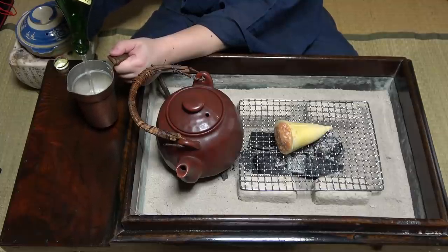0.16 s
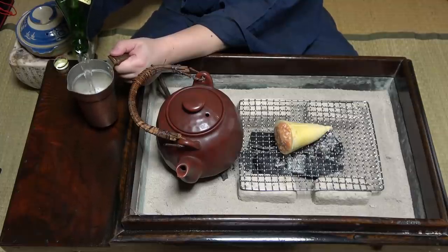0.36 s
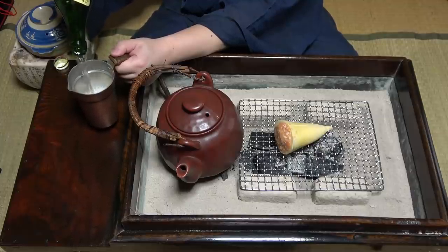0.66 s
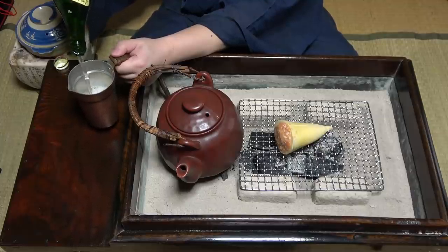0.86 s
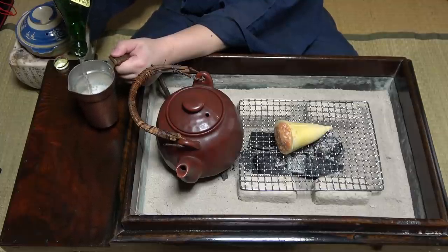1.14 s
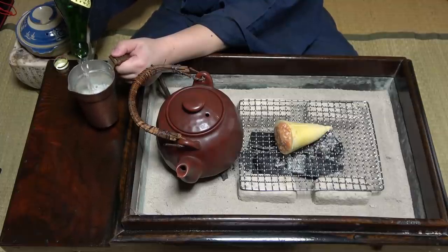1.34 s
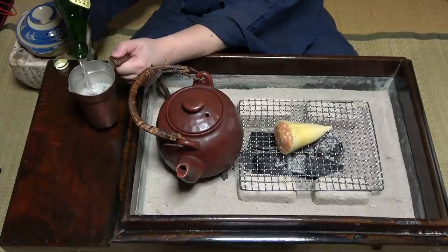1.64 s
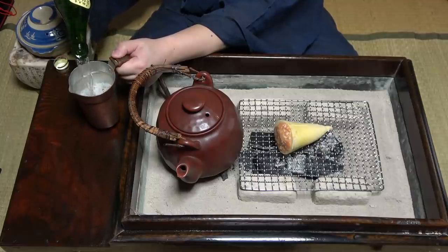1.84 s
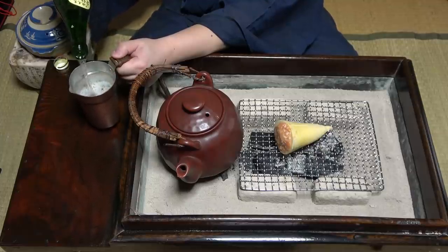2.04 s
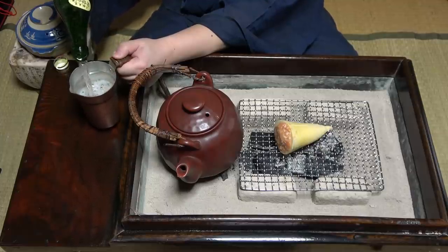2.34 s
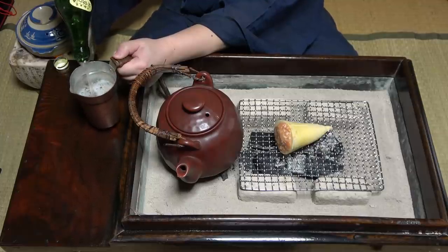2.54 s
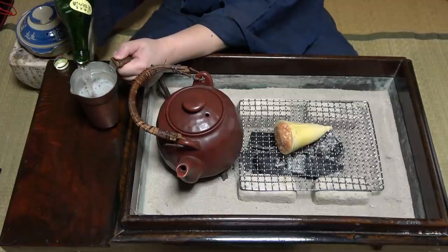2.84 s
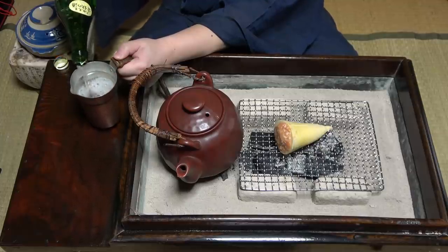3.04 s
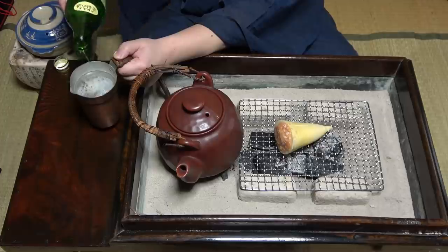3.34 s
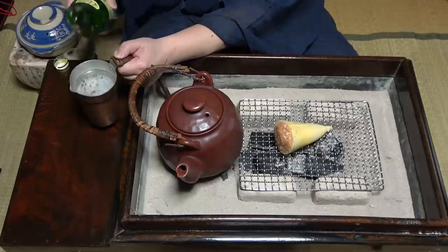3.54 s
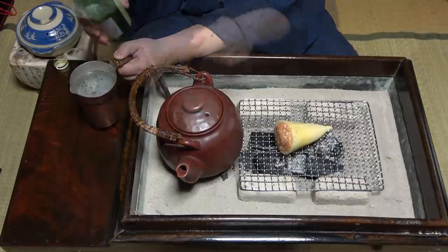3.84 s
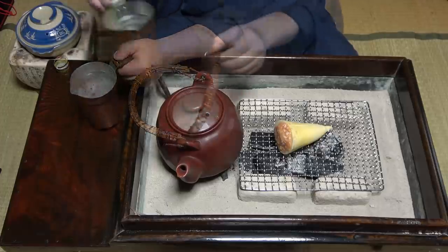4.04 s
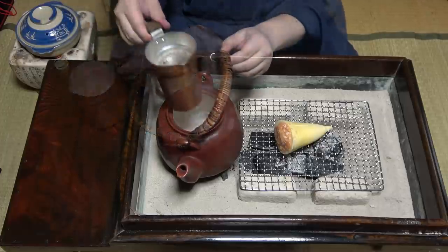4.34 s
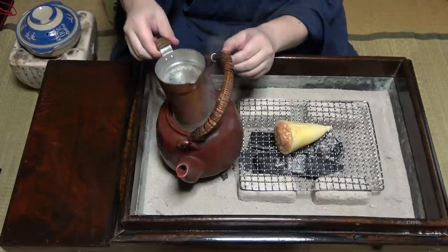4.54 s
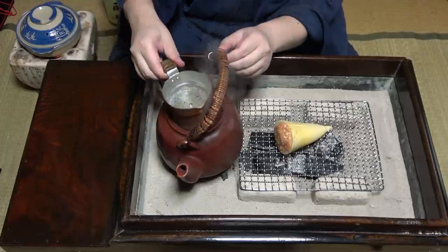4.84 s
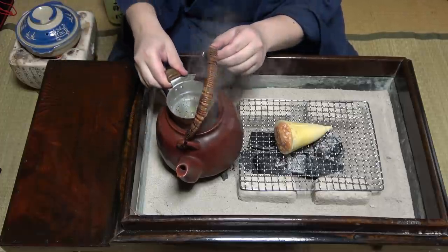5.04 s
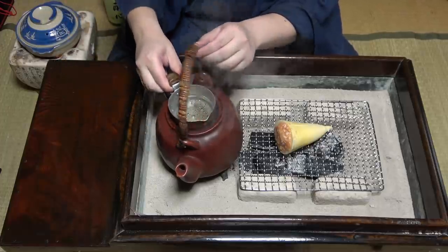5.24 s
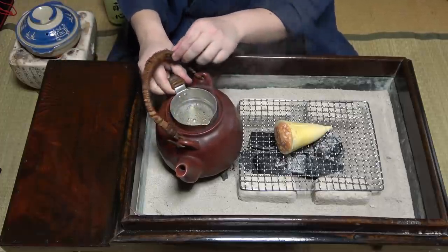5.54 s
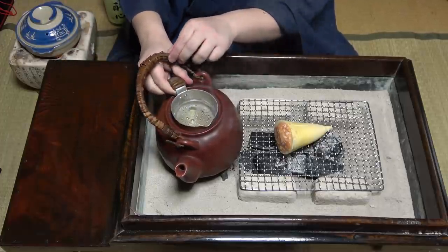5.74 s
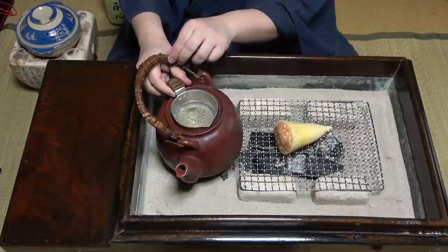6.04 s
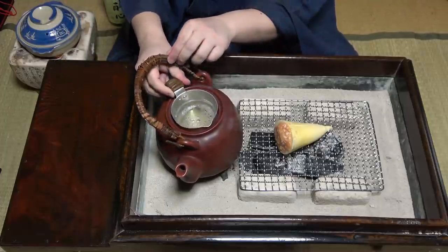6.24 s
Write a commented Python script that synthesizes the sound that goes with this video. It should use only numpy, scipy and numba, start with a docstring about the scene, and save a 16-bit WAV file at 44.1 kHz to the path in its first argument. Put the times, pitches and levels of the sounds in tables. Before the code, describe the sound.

Close up in a small, soft room, liquid bubbles and plops from a glass bottle into a metal cup, its note rising as it thins out. The bottle snaps upright and lands with muted taps. Then one very loud metal clink against a clay pot, light gritty scraping as the cup slides in, two small hollow knocks, and a final clack from the handle. Faint steady hiss.

```python
"""Pouring sake and seating the cup

Sake runs from a glass bottle into a metal cup: trapped bubbles ring near the rising note of the air column,
drops plop, foam crackles and the bottle gulps air. The bottle is put down, sounding its decaying modes.
The cup clinks on the rim of a clay pot, scrapes down into it, and the pot's handle drops back.
A small, soft room adds an echo and a short tail over a faint hiss.
The recorder's limiter ducks after the first clink and creeps back up."""
import sys
import numpy as np
from scipy import signal
from scipy.fft import rfft, irfft, next_fast_len
from scipy.io import wavfile
from scipy.ndimage import uniform_filter1d, map_coordinates
from numba import njit

SR = 44100
rng = np.random.default_rng(int(sys.argv[2]) if len(sys.argv) > 2 else 0)


def transcribe(signal):
    """Save signal, clipped to [-1, 1], as a 16-bit WAV file at the path in sys.argv[1]."""
    frames = np.atleast_2d(signal).T
    limited = np.clip(frames, -1, 1)
    pcm = np.round(limited * 32767).astype(np.int16)
    wavfile.write(sys.argv[1], SR, pcm)


N = 281358
T = np.arange(N) / SR
AGE = T[:SR * 2 // 5]  # time axis of one short sound, 0.4 s

# Levels in the tables are relative: the functions below add their own gains.
# Stream between surges, thinning until the bottle is lifted: [t/s, bubbling level/dB, spray level/dB]
STREAM = [(0, -52.5, -56), (.2, -58.5, -57.5), (1.7, -60.5, -61.5), (2.1, -63, -65.5), (3.1, -63.5, -69),
          (3.4, -63, -53.5)]
# Air column above the liquid, rising as the cup fills: [t/s, f/Hz]
AIR_COLUMN = [(0, 935), (.5, 1043), (1.2, 1070), (1.8, 1226), (2.5, 1263), (3.3, 1450)]
# Surges that churn the cup: [t/s, bubbling level/dB, foam level/dB]
SURGES = [(0.049, -53, -51.5), (0.376, -57, -46), (.725, -63, -57), (1.01, -58, -65), (1.2, -57, -67),
          (1.401, -47.5, -59), (1.82, -58, -54), (2.2, -58, -58), (2.42, -55, -68), (2.509, -59, -52.5),
          (2.679, -55, -57.5), (2.921, -78, -60.5), (3.15, -69, -69)]
# Largest gushes landing in the cup: [t/s, bubble level/dB, bubble f/Hz, hollow thump level/dB]
PLOPS = [(0.02, -27.5, 880, -38), (0.084, -34, 886, -44), (0.158, -31, 937, -60),
         (0.219, -36.5, 1050, -44.5), (0.436, -33, 990, -48.5), (0.52, -35.5, 996, -50),
         (0.654, -35, 1095, -52), (0.719, -22, 998, -48.5), (0.765, -34, 988, -71), (1.014, -38, 1050, -57),
         (1.156, -36, 1040, -46), (1.2, -30, 1044, -61), (1.373, -27, 957, -37.5),
         (1.431, -31.5, 1290, -60), (1.666, -34.5, 1080, -54), (1.766, -34.5, 1125, -42.5),
         (1.826, -33, 1086, -61), (1.994, -48, 1120, -47), (2.197, -45.5, 1290, -46),
         (2.521, -41.5, 1360, -47), (2.568, -35.5, 1420, -68), (2.655, -30.5, 975, -32.5),
         (3.045, -45.5, 1360, -74), (3.154, -40.5, 1370, -69)]
# Spectra of the pour (hollow thump, splash, stream spray, bursting foam): [f/Hz, level/dB]
THUMP = [(60, -49), (190, -31), (280, -16), (400, 14), (560, 8), (800, 6.5), (1300, 2), (2000, -15.5),
         (5000, -38)]
SPLASH = [(200, -56), (500, -51), (1200, 13.5), (2500, -2.5), (4000, -7), (8000, -8), (15000, -41)]
SPRAY = [(200, -32), (800, -6), (1800, 6), (3000, -0.5), (4200, -5), (6000, -4.5), (9000, -15),
         (15000, -37)]
FOAM = [(200, -53), (600, 0.5), (1500, 3.5), (2400, -1.5), (3300, -0.5), (4500, -12), (8000, -12),
        (15000, -29)]
# Air gulped into the bottle: [t/s, level/dB]
GULPS = [(.89, -62), (1.3, -58), (1.671, -55), (2.09, -52.5), (2.499, -54), (2.959, -63)]
# Bursting bubbles and small ticks at the bottle: [t/s, level/dB, f/Hz, snap level relative to it/dB]
TICKS = [(0.359, -39, 3340, -14), (0.377, -36, 2380, 0.5), (.948, -37, 3350, 5), (1.296, -41.5, 6400, -11),
         (1.353, -38, 3200, -7), (2.301, -33, 2410, -1), (2.304, -31, 5730, -4), (2.525, -46, 6500, 7),
         (3.488, -35, 9100, -15), (3.613, -42.5, 4200, 0)]
# Last drops running back into the bottle: [t/s, level/dB, frequency ratio]
DRIPS = [(3.403, -53, 1), (3.418, -54, 1.62), (3.488, -50.5, .99), (3.5, -51.5, 1.06)]
# Modes of the air in the bottle's neck at ratio 1: [f/Hz, level/dB, T60/s]
NECK_MODES = [(1586, -0.5, 0.13), (1845, -5, .14), (2295, -2, 0.1), (2450, -7, .12), (3260, -1, 0.062),
              (4220, -3, .05)]
# Bottle put down on the mat: [t/s, ring level/dB, thud level/dB]
SET_DOWN = [(3.61, -48, -52), (3.666, -53.5, -56), (3.701, -54, -43), (3.767, -70, -46),
            (3.836, -37.5, -50), (3.857, -70, -51)]
# Modes of the glass bottle: [f/Hz, level/dB, T60/s]
BOTTLE_MODES = [(530, -5.5, 0.036), (650, -9.5, 0.033), (984, -3, 0.093), (1370, -3.5, 0.036),
                (1525, -1, 0.065), (3460, -5.5, 0.021), (4220, -18, 0.035)]
# Spectrum of the soft landing: [f/Hz, level/dB]
THUD = [(30, -14), (80, -7), (200, 2.5), (400, -6), (800, -11), (2000, -26), (8000, -48)]
# Dry snap as the bottle is turned upright: (t/s, level/dB)
SNAP_AT = (3.566, -25.5)
# Spectrum of that snap: [f/Hz, level/dB]
SNAP = [(300, -38), (1000, -23), (1600, -9), (2500, -15), (3300, -2.5), (4400, -5.5), (5600, 5),
        (6400, -13), (9000, -16.5), (15000, -36)]
# Cup and handle knocking on the pot: [t/s, cup ring level/dB, pot ring level/dB, crack level/dB]
KNOCKS = [(4.368, 5.5, -25, -2.5), (4.675, -41, -39, -30), (4.721, -55, -60, -38), (4.766, -49, -59, -38),
          (4.79, -45.5, -53, -37), (4.873, -48, -60, -36), (4.971, -54, -62, -38.5), (5.014, -41, -52, -39),
          (5.101, -21.5, -22, -27), (5.1083, -17.5, -49, -46), (5.247, -33, -36.5, -52),
          (5.345, -50, -43.5, -53), (5.36, -49, -39.5, -60.5), (5.427, -52, -39.5, -59),
          (5.663, -38, -38, -36), (5.7603, -38, -22, -22.5), (5.776, -27.5, -23.5, -28)]
# Modes of the metal cup before the rim damps it: [f/Hz, level/dB, T60/s]
CUP_MODES = [(1098, -12.5, 0.24), (1550, -9, 0.034), (1794, -2.5, 0.05), (1861, -16.5, 0.19),
             (1950, -19, 0.059), (2134, -28, 0.09), (2581, -37.5, 0.31), (3580, -19.5, 0.014),
             (4000, -27, 0.058), (4400, -23, 0.027), (4875, -41, 0.39), (5060, -26, 0.04),
             (5690, -32, 0.081), (5830, -29.5, 0.072), (6430, -19.5, 0.043), (7800, -30, 0.033)]
# Modes of the clay pot with its mouth stopped: [f/Hz, level/dB, T60/s]
POT_MODES = [(320, -14, 0.076), (371, -11, 0.079), (624, -1.5, 0.054), (797, -7.5, 0.056),
             (880.6, -4.5, 0.091), (1085, 6, 0.095), (1520, 2.5, 0.048), (1642, -14.5, 0.15),
             (1821, 0, 0.085), (1930, -4, .1), (2310, -15.5, 0.091), (2412, -12.5, 0.061),
             (2580, -18.5, .08), (2875, -20, .12), (4000, -18, .12), (4280, -24, 0.042), (5340, -15.5, .09)]
# Modes of the air in the pot at ratio 1: [f/Hz, level/dB, T60/s]
CAVITY_MODES = [(415, -25.5, 0.16), (465, -10, 0.1), (532.4, -22, 0.14), (681.5, -19.5, 0.023),
                (783, -15, .04), (928, -8.5, 0.068), (1005.5, 0, .125)]
# Tuning of that air as the cup sinks in: [t/s, frequency ratio]
SINKING = [(4.368, 1), (5.11, 1.01), (5.4, .78)]
# Spectra of a knock (contact crack; dense, short ring of clay and cane): [f/Hz, level/dB]
CRACK = [(30, -13.5), (250, -7.5), (600, 2), (2000, 4.5), (2800, -12), (4500, -2), (7000, -14),
         (10000, -14.5), (15000, -28)]
CLATTER = [(100, -32.5), (220, -13.5), (360, -6), (470, -12), (700, -0.5), (950, 6.5), (1350, -3.5),
           (1650, 0.5), (2400, -9.5), (3000, -16.5), (4500, -18.5), (7000, -31), (15000, -44)]
# Wooden hearth swaying after the heavier knocks: [t/s, level/dB, f/Hz]
SWAY = [(4.39, -55, 38.05), (5.8, -56.5, 42.2)]
# Three pushes of the cup's wall along the rim: [t/s, length/s, rasp level/dB, singing wall level/dB]
PUSHES = [(4.684, 0.19, -55, -49.5), (4.97, 0.15, -49.5, -57), (5.247, 0.13, -56, -62.5)]
# Spectrum of the sliding grit: [f/Hz, level/dB]
RASP = [(200, -22), (450, 0), (700, -14), (1100, 3.5), (1900, -0.5), (2700, -15), (3400, -10),
        (5000, -15.5), (7000, -18), (15000, -34)]
# Spectrum of the background hiss: [f/Hz, level/dB]
FLOOR = [(15, -40.5), (25, -10), (129, -7.5), (169, -7.5), (305, -4), (433, -4), (523, -4.5), (684, -3.5),
         (762, -6.5), (826, -4.5), (2010, -9), (3170, -9), (15500, -16.5)]

SURGE_ATTACK_S, CHURN_T60_S, FOAM_T60_S = 0.0067, 0.35, 0.27
DROPS_PER_S, DROP_OVER_CHURN_DB, DROP_SCATTER_DB, DROP_DETUNE, DROP_THUMP_DB = 14, 14, 1.5, .16, -18
BROOD_T60_S = .028
GULP_HZ, GULP_RISE_HZ_PER_S = 72, 7.7
TICK_T60_S = 0.027
PUSH_ATTACK_S, PUSH_RELEASE_T60_S = 0.015, 0.32
FLOOR_DB = -62.5
TOP_HZ = 15600


def stream(column_width_hz=140.0, hollow_hz=470, hollow_width_hz=78.0, hollow_sink=0.1, hollow_db=-5.5,
           hollow_fall_db=6.5, bubbles_db=-2, column_db=-3.5, spray_db=-3):
    """Resonance under random drive: the thin stream drums on the cup's air and drags down a bubble swarm."""
    note = curve(AIR_COLUMN)
    end = STREAM[-1][0]
    swarm = np.zeros(N)
    for when, pitch, size, life in rng.random((520, 4)):
        s = when * end
        hz = note[int(s * SR)] * 0.826 * 3.8 ** (pitch ** 1.3)
        level = amp(11.7 * size ** 3 - 10 * pitch)
        add(swarm, s, level * bubble(hz, (16 + 34 * life) / hz, glide=0.13))
    swarm /= np.std(swarm[T < end])
    patter = clicks(rate=330, spread_db=3.5) * uneven(rate=43, depth_db=4)
    column = unit(resonate(resonate(patter, note, column_width_hz), note, 900.0))
    # the dent that the stream makes in the surface sounds low, and fades as the fall gets shorter
    dent_hz = hollow_hz / (1 + hollow_sink * T)
    hollow = unit(resonate(resonate(patter, dent_hz, hollow_width_hz), dent_hz, 2 * hollow_width_hz))
    hollow = hollow * amp(hollow_db - hollow_fall_db * T)
    spray = colour(clicks(rate=900, spread_db=4.0), SPRAY) * amp(curve(STREAM, axis=2) + spray_db)
    flowing = np.interp(T, [3.2, 3.42], [1, 0])
    bubbling = amp(column_db) * column + amp(bubbles_db) * swarm + hollow
    return flowing * (churn() * bubbling + spray)


def churn():
    """Superposed decay: the steady stream's bubbling plus each surge dying away exponentially."""
    surges = sum(amp(db) * swell(s, SURGE_ATTACK_S, SURGE_ATTACK_S, CHURN_T60_S) for s, db, _ in SURGES)
    return amp(curve(STREAM)) + surges


def plops(bubble_db=0, thump_db=3, dunk_db=1, dunk_hz=395, splash_db=-25, splash_growth=.55,
          brood_db=-13, brood_s=.08):
    """Bubble entrainment: a gush slaps the surface, opens a hollow, traps one large bubble and sheds small ones."""
    out = np.zeros(N)
    for s, db, hz, low_db in PLOPS + drops():
        add(out, s, amp(db + bubble_db) * bubble(hz, t60=0.035, glide=0.031, rise_cycles=1.0))
        add(out, s, amp(low_db + thump_db) * burst(THUMP, t60=0.031))
        add(out, s, amp(low_db + dunk_db) * bubble(dunk_hz, t60=0.042, glide=0.17, rise_cycles=1.0))
        # the splash varies less in level than the bubble
        add(out, s, amp(splash_growth * db + splash_db) * burst(SPLASH, t60=0.017))
        for delay, pitch in rng.random((3, 2)):
            small = bubble(hz * 2.3 ** pitch, t60=BROOD_T60_S, glide=0.074)
            add(out, s + brood_s * delay, amp(db + brood_db - 8 * pitch) * small)
    return out


def drops():
    """Random arrivals: lesser plops follow the churning in level and the air column in pitch, as rows of PLOPS."""
    end = STREAM[-1][0] - .2
    when, strength, detune = rng.random((120, 3))[:int(DROPS_PER_S * end)].T
    s = when * end
    churn_db = 20 * np.log10(np.interp(s, T, churn()))
    db = churn_db + DROP_OVER_CHURN_DB + DROP_SCATTER_DB * (2 * strength - 1)
    hz = np.interp(s, T, curve(AIR_COLUMN)) * (1 + DROP_DETUNE * (2 * detune - 1))
    return list(zip(s, db, hz, db + DROP_THUMP_DB))


def froth():
    """Shot noise of bursting films: after a surge, a patch of tiny bubbles crackles away."""
    foam = colour(clicks(rate=1300, spread_db=2.5), FOAM)
    patches = sum(amp(db) * swell(s, SURGE_ATTACK_S, SURGE_ATTACK_S, FOAM_T60_S) for s, _, db in SURGES)
    return foam * patches


def bottle():
    """Air and wall modes: gulps climb in pitch, films burst, drips ring the neck, the glass lands on the mat."""
    out = np.zeros(N)
    for s, db in GULPS:
        gulp = bubble(GULP_HZ + GULP_RISE_HZ_PER_S * s, t60=0.11, glide=0.73, rise_cycles=1.6)
        add(out, s, 2 * amp(db) * gulp)
    for s, db, hz, snap_db in TICKS:
        film = [(hz / 4, -40), (hz / 2, -26), (hz * 0.82, -15), (hz, 0), (hz * 1.17, -16), (hz * 2, -34)]
        add(out, s, amp(db) * burst(film, TICK_T60_S))
        add(out, s, amp(db + snap_db) * rng.standard_normal(len(AGE)) * fade(t60=0.015) / 2)
    for s, db, ratio in DRIPS:
        add(out, s, amp(db) * ring(NECK_MODES, ratio) / 2)
    for s, ring_db, thud_db in SET_DOWN:
        add(out, s, amp(ring_db) * ring(BOTTLE_MODES) / 2 + amp(thud_db) * burst(THUD, t60=0.053))
    return out


def upright_snap():
    """Impulsive noise: one dry snap as the bottle is turned upright."""
    out = np.zeros(N)
    s, db = SNAP_AT
    add(out, s, amp(db) * burst(SNAP, t60=0.015))
    return out


def cup_in_pot():
    """Coupled resonators: knocks and a gritty slide set the metal, the clay and the air inside ringing."""
    metal, clay = ring(CUP_MODES), ring(POT_MODES)
    return knocking(metal, clay) + scraping(metal, clay)


def knocking(metal, clay, clay_db=-14, cup_db=-4, clatter_db=-3, thud_db=-25, low_cut_hz=230):
    """Impact excitation: each knock rings the modes of cup, pot and enclosed air, with a crack of contact noise."""
    out = np.zeros(N)
    for s, db, pot_db, crack_db in KNOCKS:
        ratio = np.interp(s, *np.transpose(SINKING))
        # once the cup is seated, the rim damps its wall: an extra decay whose T60 falls from 4 to 0.16 s
        damping = fade(np.interp(s, [4.9, 5.25], [4, .16]))
        cup_and_air = damping * metal + ring(CAVITY_MODES, ratio)
        ringing = amp(db + cup_db) * cup_and_air + amp(pot_db + clay_db) * clay
        add(out, s, high_pass(ringing, low_cut_hz) + amp(crack_db) * burst(CRACK, t60=0.032))
        add(out, s, amp(pot_db + clatter_db) * high_pass(burst(CLATTER, t60=0.14), hz=169.7))
        # only a heavy blow also thuds through the hearth
        if db > 0:
            add(out, s, amp(db + thud_db) * (fade(t60=0.0016) - fade(t60=0.015)))
    for s, db, hz in SWAY:
        add(out, s, amp(db) * bubble(hz, t60=.45, glide=0, rise_cycles=2))
    return out


def scraping(metal, clay, scrape_pot_db=-8, walls_db=-3, grit_db=-4, sing_hz=1085.0, sing_width_hz=16.0):
    """Frictional excitation: random slips shake the walls but hardly move the air in the pot."""
    slips = clicks(rate=600, spread_db=2.5) * uneven(rate=70, depth_db=5.0)
    walls = signal.fftconvolve(slips, metal + amp(scrape_pot_db) * clay)[:N]
    rasp = amp(walls_db) * unit(high_pass(walls, 780)) + amp(grit_db) * colour(slips, RASP)
    # the lowest wall mode sings on under the rubbing
    note = np.full(N, float(sing_hz))
    sing = unit(resonate(resonate(slips, note, sing_width_hz), note, 4 * sing_width_hz))
    out = np.zeros(N)
    for s, length, rasp_db, sing_db in PUSHES:
        push = swell(s, PUSH_ATTACK_S, length, PUSH_RELEASE_T60_S)
        out += push * (amp(rasp_db) * rasp + amp(sing_db) * sing)
    return out


def room(x, wet_db, lead_ms, pan_db, echo_db, echo_s=.0147, t60=0.23, first_s=.004):
    """Reflection and arrival time: left leads by lead_ms; the low ceiling echoes once, the walls give a tail."""
    tail_spectrum = [(100, -4.0), (500, 1.5), (2000, 0.0), (6000, -2.5), (15000, -5.5)]
    tail = colour(diffuse(len(AGE)), tail_spectrum) * fade(t60) * (AGE > first_s)
    tail /= np.sqrt(np.sum(tail ** 2) / 2)
    near = x.copy()
    add(near, echo_s, amp(echo_db) * uniform_filter1d(x, size=5))
    late = map_coordinates(near, [np.arange(N) - lead_ms * SR / 1000], order=3)
    direct = np.array([near * amp(pan_db / 2), late * amp(-pan_db / 2)])
    return direct + amp(wet_db) * signal.fftconvolve(x[None], tail, axes=1)[:, :N]


def hiss():
    """Stationary noise: a faint, steady, coloured background in both channels."""
    return amp(FLOOR_DB) * colour(diffuse(N, apart_hz=387), FLOOR)


def diffuse(size, apart_hz=3000):
    """Diffuse-field coherence: on two close microphones noise is alike in the bass, unrelated in the treble."""
    mid, side = rfft(rng.standard_normal((2, size)))
    like = .95 / (1 + (np.fft.rfftfreq(size, 1 / SR) / apart_hz) ** 2)
    return irfft(mid * np.sqrt(1 + like) + side * np.sqrt(1 - like) * np.array([[1], [-1]]), size)


def bubble(hz, t60, glide, rise_cycles=1.0):
    """Volume pulsation: a bubble swells over about rise_cycles and rings; pitch climbs as it nears the surface."""
    t = AGE[:int(t60 * SR) + 2]
    tone = np.sin(2 * np.pi * hz * (t + glide * t ** 2 / (2 * t60)))
    onset = 1 - np.exp(-(hz * t / rise_cycles) ** 2)
    return tone * fade(t60, t) * onset


def ring(modes, ratio=1):
    """Modal superposition: decaying modes of a struck thing; neighbours swing in opposite senses."""
    total = 0
    for k, (hz, db, t60) in enumerate(modes):
        total = total + (-1) ** k * amp(db) * np.sin(2 * np.pi * hz * ratio * AGE) * fade(t60)
    return total


def burst(points, t60):
    """Transient noise: a dying puff of coloured noise, peak near 1."""
    shape = fade(t60)
    puff = colour(rng.standard_normal(len(AGE)) * shape, points)
    return puff * np.sqrt(np.mean(shape ** 2)) / 2


def clicks(rate, spread_db):
    """Random point process: tiny impacts of uneven size and either sign, about rate per second."""
    size = amp(spread_db * np.minimum(rng.exponential(size=N), 4))
    return (rng.random(N) < rate / SR) * size * rng.choice([-1, 1], N)


def uneven(rate, depth_db):
    """Random modulation: a gain that wanders about rate times a second."""
    hold = max(int(SR / rate), 1)
    steps = np.repeat(rng.standard_normal(N // hold + 1), hold)
    return amp(depth_db * uniform_filter1d(steps, hold)[:N])


def swell(start, attack_s, hold_s, t60):
    """Envelope: rises linearly, holds until hold_s after the start, then decays exponentially."""
    age = T - start
    return np.clip(age / attack_s, 0, 1) * fade(t60, np.maximum(age - hold_s, 0))


def fade(t60, t=AGE):
    """Exponential decay: 60 dB of fall in t60 seconds."""
    return np.exp(-np.log(1000) * t / t60)


@njit
def resonate(x, hz, width):
    """Simple resonator: a band-pass whose centre may move, gain 1 at the centre."""
    y, band, low = np.empty(len(x)), 0., 0.
    for i in range(len(x)):
        g, k = np.tan(np.pi * hz[i] / SR), width / hz[i]
        v = (band + g * (x[i] - low)) / (1 + g * (g + k))
        band, low, y[i] = 2 * v - band, low + 2 * g * v, k * v
    return y


def colour(x, points):
    """Minimum-phase filtering: shapes a sound causally to [f/Hz, level/dB] points; rms 1."""
    hz, db = np.transpose(points)
    size = next_fast_len(x.shape[-1] // 2 + 1) * 2
    f = np.maximum(np.fft.rfftfreq(size, 1 / SR), 1)
    cepstrum = irfft(np.log(amp(np.interp(np.log(f), np.log(hz), db))))
    # doubling the first half of the cepstrum makes the response causal
    response = np.exp(rfft(2 * cepstrum[:size // 2], size))
    return unit(irfft(rfft(x, size) * response)[..., :x.shape[-1]])


def high_pass(x, hz):
    """Second-order high-pass: takes away the bass below hz."""
    return signal.sosfilt(signal.butter(2, hz, "high", fs=SR, output="sos"), x)


def amp(db):
    """Logarithmic level: decibels to gain."""
    return 10 ** (np.asarray(db) / 20)


def unit(x):
    """Normalisation: scales to rms 1."""
    return x / np.sqrt(np.mean(x ** 2))


def curve(rows, axis=1):
    """Linear interpolation: one column of a table joined by straight lines in time."""
    rows = np.array(rows)
    return np.interp(T, rows[:, 0], rows[:, axis])


def add(out, s, x):
    """Superposition: mixes a short sound in at time s."""
    i = max(int(s * SR), 0)
    out[i:i + len(x)] += x[:max(N - i, 0)]


def scene(boom_hz=400, boom_width_hz=1200.0, boom_db=-13):
    """Superposition in the room: pouring at the left, the pot nearer the middle, over a faint hiss."""
    liquid = high_pass(stream() + plops() + froth(), hz=190)
    pouring = room(liquid, wet_db=-9.5, lead_ms=0.04, pan_db=1.5, echo_db=-8.5)
    handling = room(bottle(), wet_db=-6.0, lead_ms=0.048, pan_db=2.5, echo_db=-17.5)
    knocks = cup_in_pot()
    pot = room(knocks, wet_db=-16.0, lead_ms=0.034, pan_db=1.0, echo_db=-22.0, echo_s=0.016)
    # the hollow note of the pot is stronger on the left: added there, subtracted on the right
    hollow_note = resonate(knocks, np.full(N, float(boom_hz)), boom_width_hz)
    boom = amp(boom_db) * hollow_note * np.array([[1], [-1]])
    snap = room(upright_snap(), wet_db=-16, lead_ms=0, pan_db=3.5, echo_db=-32)
    return pouring + handling + pot + boom + snap + hiss()


def record(dry, ceiling_db=-2, release_db_per_s=10):
    """Peak limiting: the gain clamps at once and lets go slowly; then a low-pass cuts the top."""
    over_db = np.maximum(20 * np.log10(np.abs(dry).max(axis=0) + 1e-9) - ceiling_db, 0)
    # the running maximum on a tilted axis falls at the release rate
    duck_db = np.maximum.accumulate(over_db + release_db_per_s * T) - release_db_per_s * T
    top_cut = signal.ellip(8, .2, 70, TOP_HZ, fs=SR, output="sos")
    return signal.sosfilt(top_cut, dry * amp(-duck_db))


dry = scene()
out = record(dry)
transcribe(out)
```